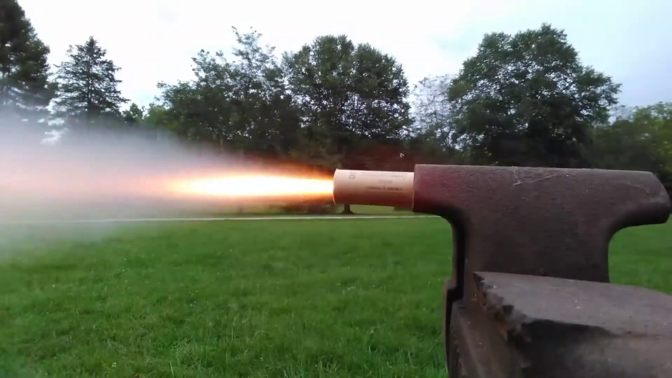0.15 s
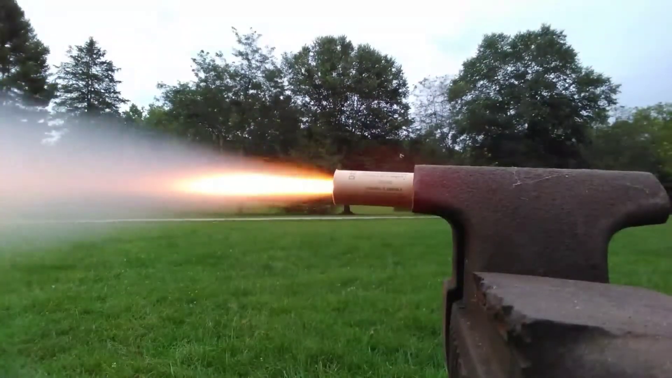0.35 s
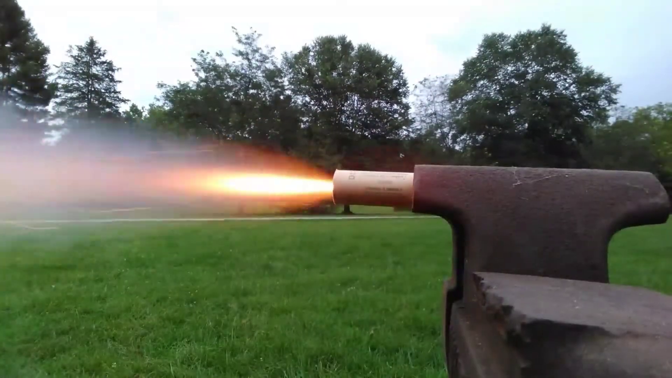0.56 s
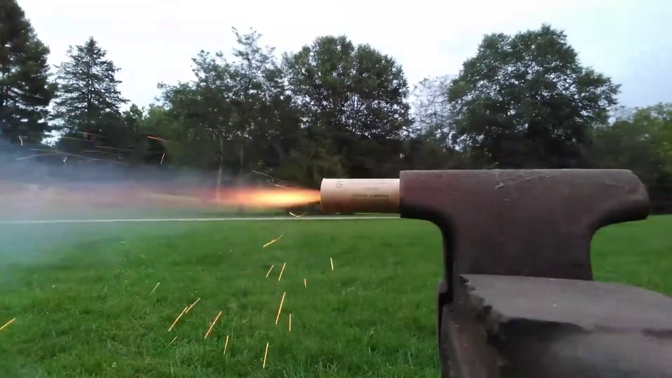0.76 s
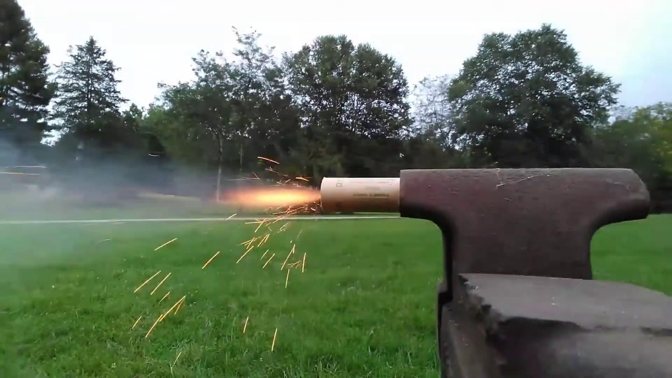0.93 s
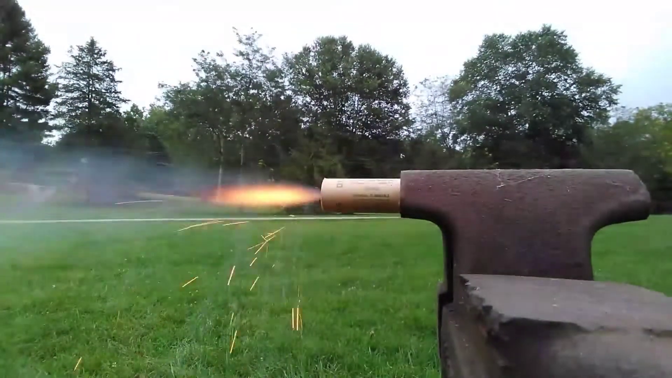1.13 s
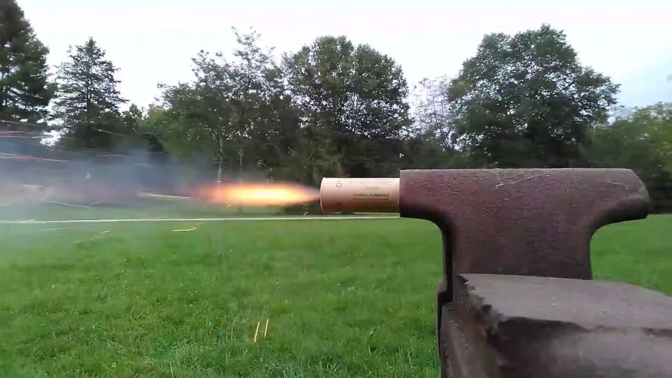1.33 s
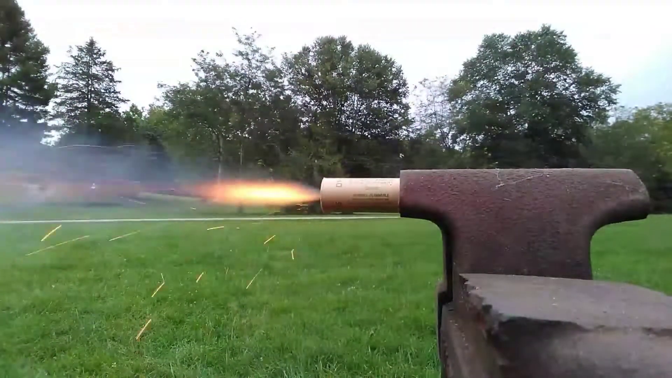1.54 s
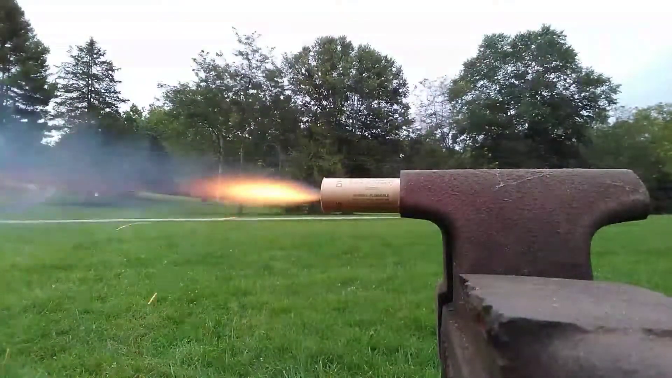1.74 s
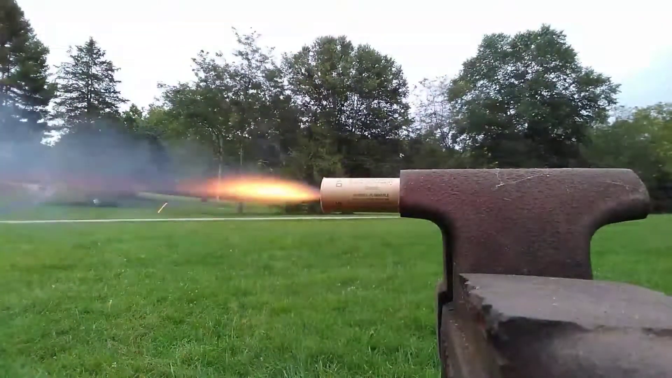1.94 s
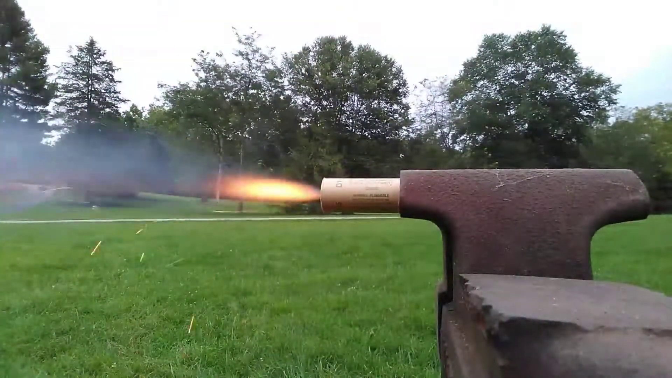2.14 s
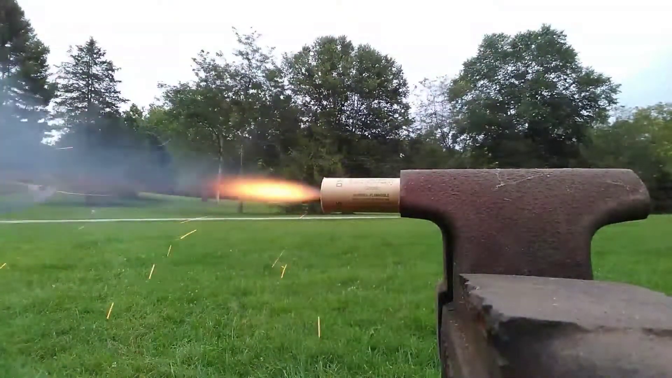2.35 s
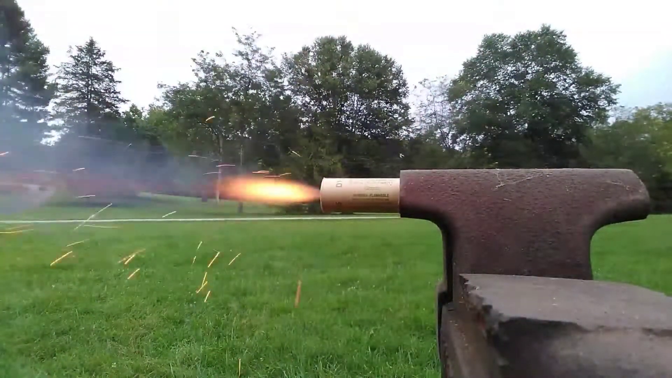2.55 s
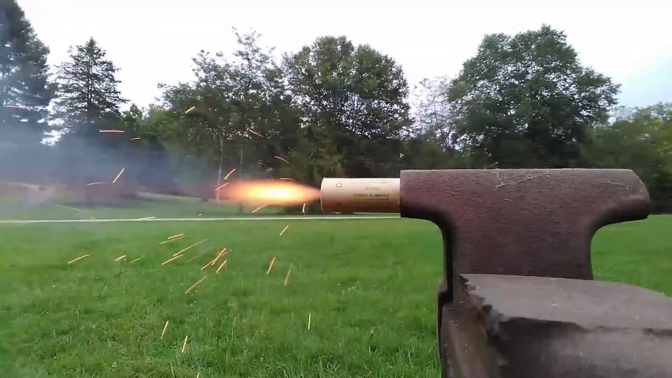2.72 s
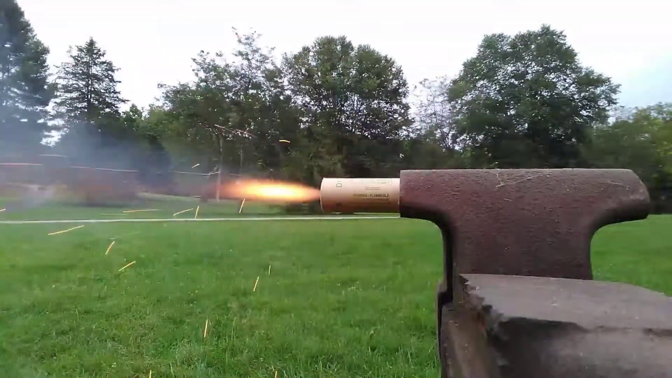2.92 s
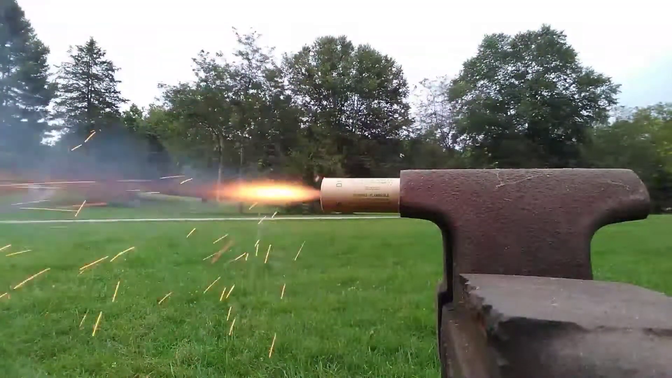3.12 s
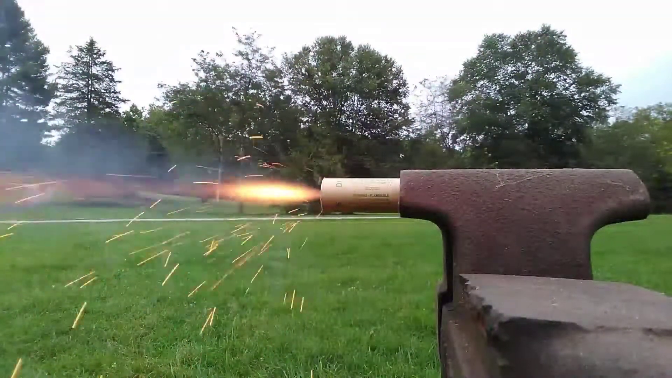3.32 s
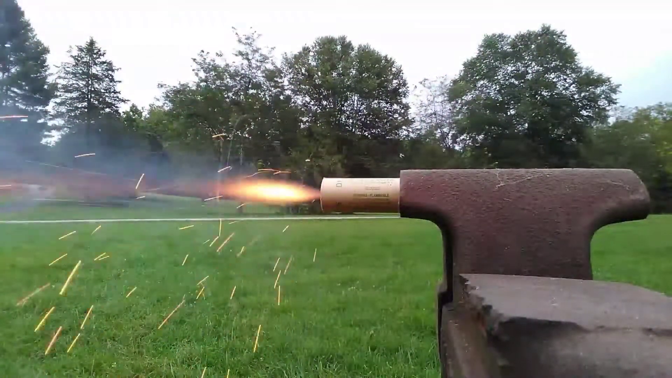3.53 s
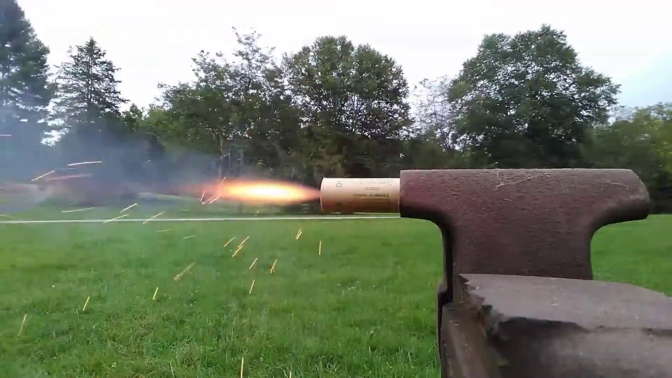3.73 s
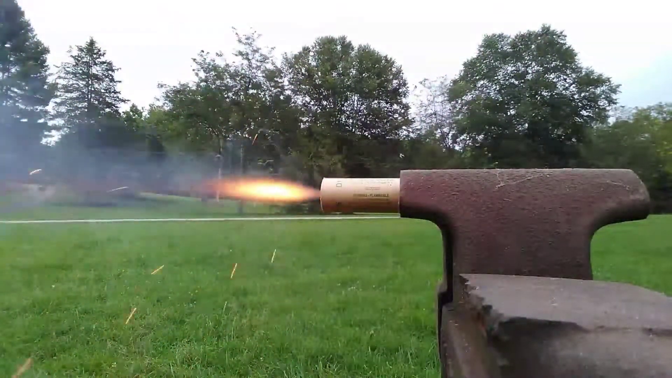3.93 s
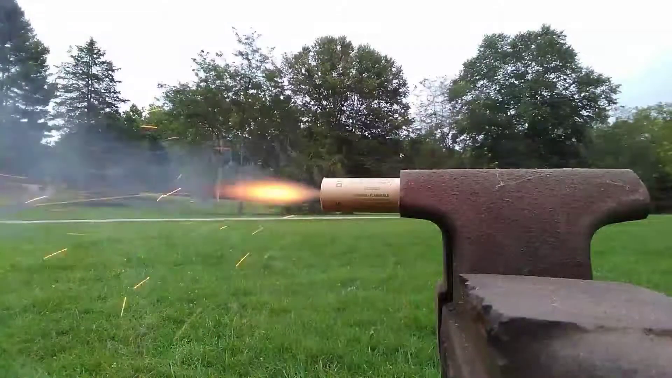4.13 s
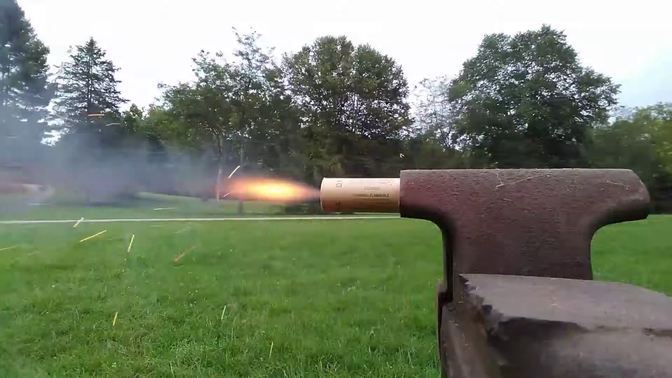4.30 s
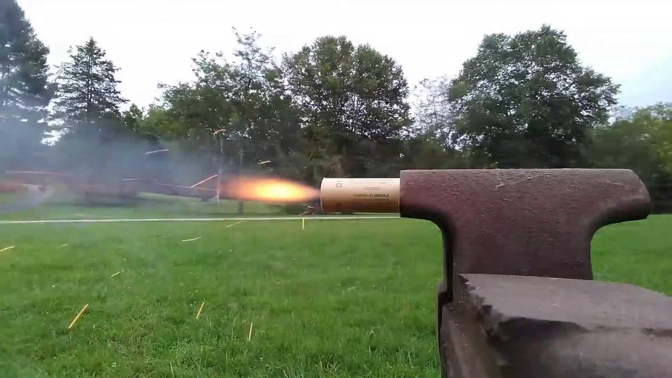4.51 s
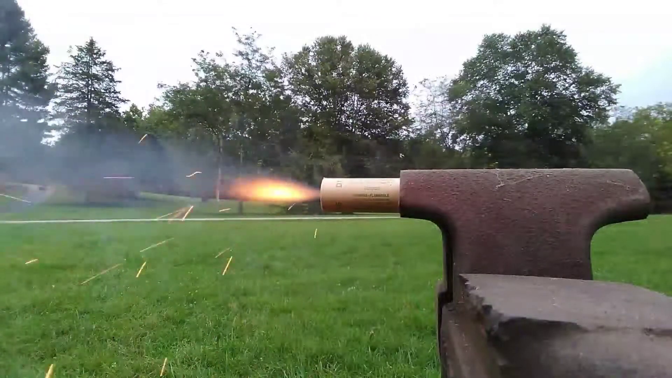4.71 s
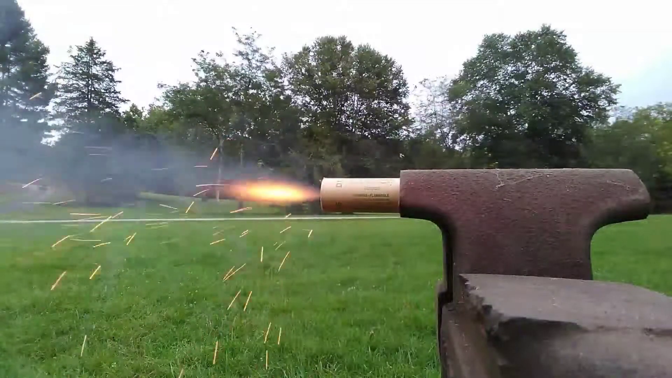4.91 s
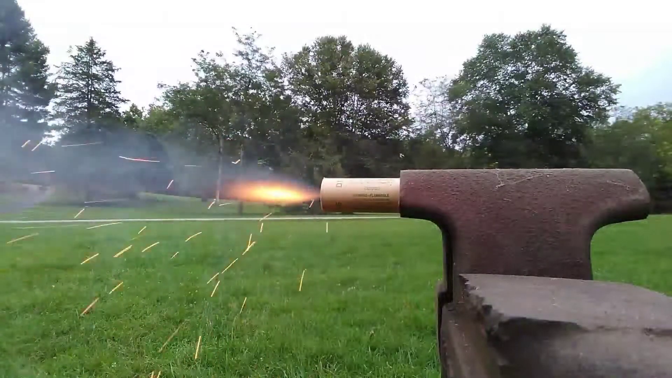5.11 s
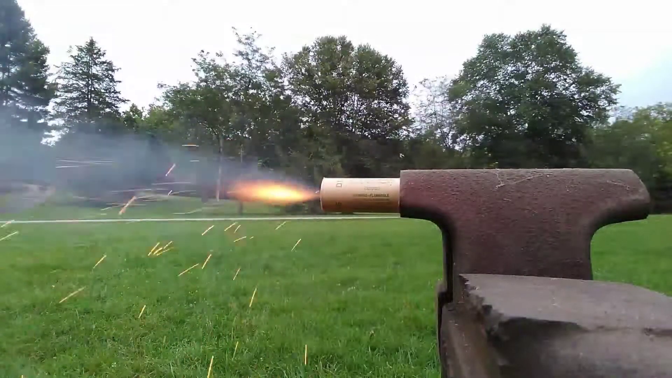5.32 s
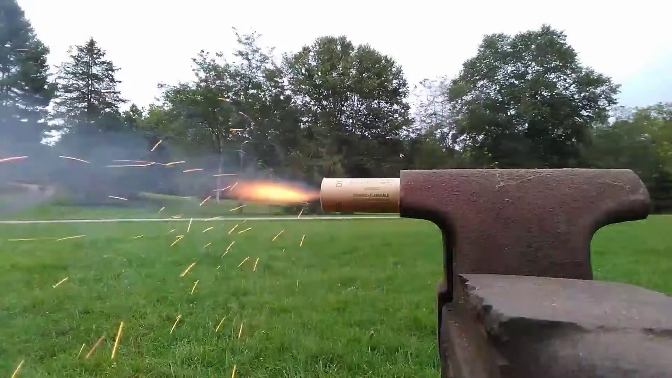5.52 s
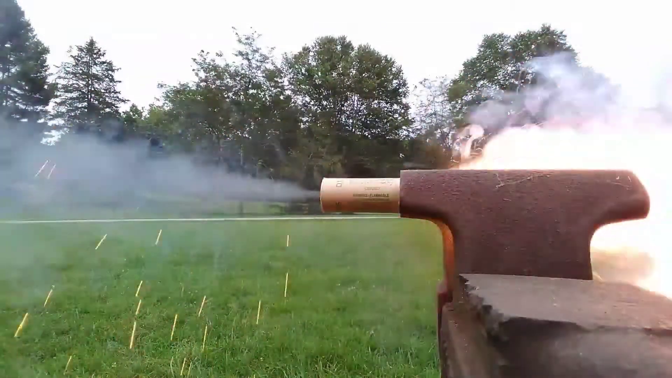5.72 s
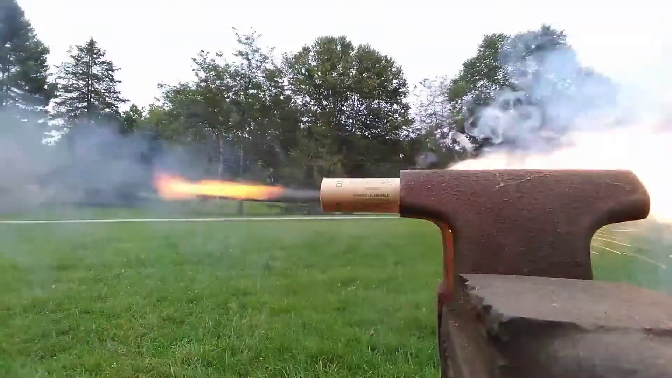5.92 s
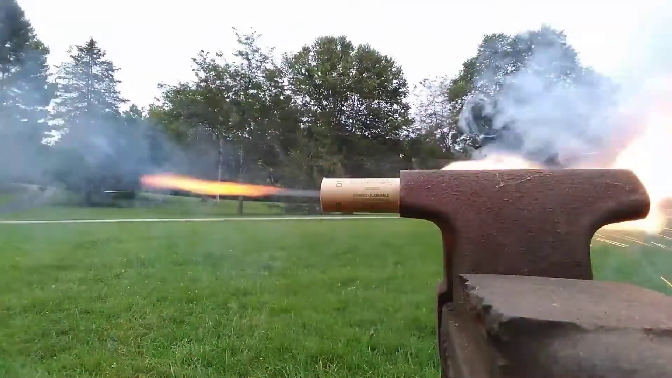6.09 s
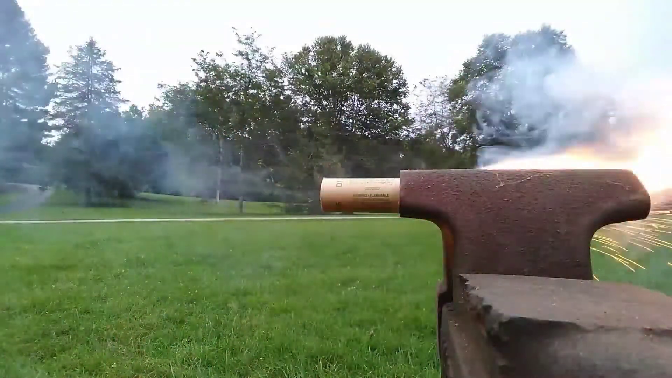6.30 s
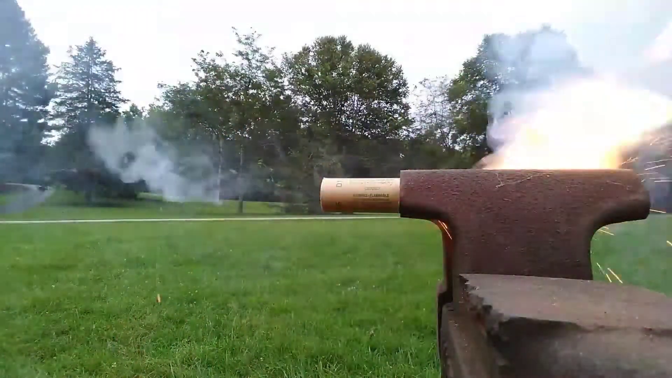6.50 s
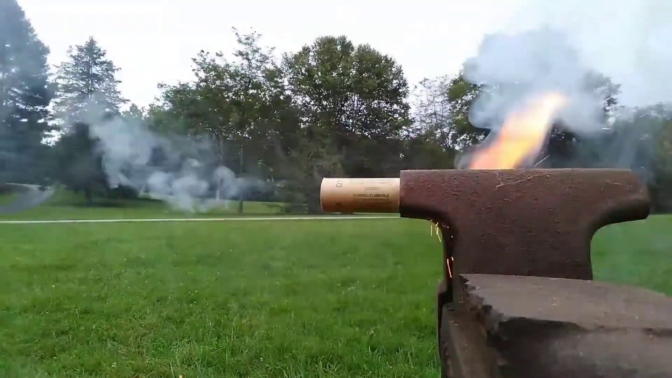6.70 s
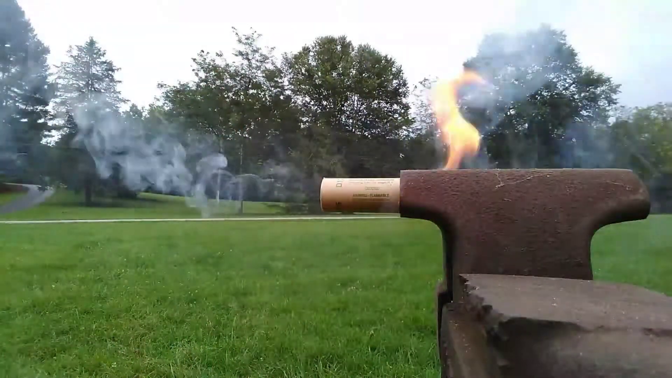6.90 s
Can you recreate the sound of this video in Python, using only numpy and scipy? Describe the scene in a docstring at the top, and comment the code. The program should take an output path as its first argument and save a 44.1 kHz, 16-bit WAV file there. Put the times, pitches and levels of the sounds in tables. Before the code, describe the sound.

A broad, loud rush of burning gas collapses abruptly into a thin, slightly hollow hiss with small flickers and surges. It grows for over a second and holds, slowly sinking, until a snappy double crack and pop cut it off. A short low whoosh vents and dies, a dull echo fades from the trees, and a very faint smoulder and distant insect are left. Close, wide stereo phone pickup in open air.

```python
"""Small rocket motor in a vise

A small black-powder rocket motor burns in a steel vise on a lawn, close to a phone held sideways.
Plume, flame and vented gas are turbulent noise shaped in colour and level; puffs are damped, sagging tones.
The plume roars, shrinks to a hiss at the nozzle, then the ejection charge blows out of the far end.
Trees return a scattered echo, the casing smoulders over still air and a far insect joins in.
The phone widens its two ports by subtracting each from the other."""
import sys
import numpy as np
from scipy import signal
from scipy.fft import rfft, irfft, next_fast_len
from scipy.io import wavfile
from scipy.ndimage import uniform_filter1d, map_coordinates

SR = 44100
rng = np.random.default_rng(int(sys.argv[2]) if len(sys.argv) > 2 else 0)


def decibels_to_gain(level_db):
    """Convert a level in decibels to a linear amplitude gain (20 dB per decade)."""
    exponent = np.asarray(level_db, float) / 20
    return 10 ** exponent


def dump(signal):
    """Clip the signal to [-1, 1] and save it as 16-bit WAV at the path in sys.argv[1]."""
    limited = np.clip(np.atleast_2d(signal).T, -1, 1)
    pcm = np.round(limited * 32767).astype(np.int16)
    wavfile.write(sys.argv[1], SR, pcm)


N = 306495  # samples
SIZE = next_fast_len(N + 8192)  # transform length with room for filter tails
HZ = np.fft.rfftfreq(SIZE, 1 / SR)
T = np.arange(N) / SR


def curve(rows, column=1):
    """Linear interpolation: a table column over time, held at its ends."""
    return np.interp(T, [r[0] for r in rows], [r[column] for r in rows])


def across(rows, column=1):
    """Interpolation on a logarithmic frequency axis: a table column over frequency."""
    return np.interp(np.log(HZ + 1), np.log([r[0] for r in rows]), [r[column] for r in rows])


def sound(spectrum):
    """Inverse Fourier transform: back from frequencies to samples."""
    return irfft(spectrum, SIZE)[..., :N]


def filtered(x, gain):
    """Linear filtering: multiplies the spectrum by a gain for each frequency."""
    return sound(rfft(x, SIZE) * gain)


def delay(ms):
    """A pure lag is a phase that falls linearly with frequency."""
    return np.exp(-2j * np.pi * HZ * ms / 1000)


def resonance(hz, width_hz, db):
    """A resonance is a bell-shaped lift about its centre frequency."""
    return 1 + (decibels_to_gain(db) - 1) / (1 + (2 * (HZ - hz) / width_hz) ** 2)


def unit(x):
    """Normalisation to an rms of 1 over all samples and ports."""
    return x / np.sqrt(np.mean(x ** 2))


def ramp(start, length):
    """Linear onset: climbs from 0 to 1 over length s."""
    return np.clip((T - start) / length, 0, 1)


def since(start):
    """Elapsed time: seconds after start, 0 before."""
    return np.maximum(T - start, 0)


def bumps(rows):
    """Gaussian swells and dips in dB; each length is the full width at 1/e."""
    return sum(db * np.exp(-(2 * (T - s) / length) ** 2) for s, db, length in rows)


def walk(rate):
    """Slow random modulation: levels held 1 / rate s, then smoothed twice, with an rms of 1."""
    k = int(SR / rate)
    held = np.repeat(rng.standard_normal(N // k + 1), k)
    slewed = uniform_filter1d(uniform_filter1d(held, k), k)
    return unit(slewed[:N])


def turbulence(gust_db, flicker_db, rate):
    """Turbulent noise: incoherent at two ports, its octaves sharing gusts but flickering each alone."""
    out, gust = 0, gust_db * walk(rate)
    for low in 20 * 2. ** np.arange(10):
        band = filtered(rng.standard_normal((2, N)), (HZ >= low) & (HZ < 2 * low))
        out = out + band * decibels_to_gain(gust + flicker_db * walk(2.5 * rate))
    return out


def puff(s, first_hz, t60, left, right, sag):
    """Damped oscillation: a puff of pressure swings ever more slowly as the gas cloud grows."""
    t, sag_time_s = since(s), .009
    hz = first_hz * (sag + (1 - sag) * np.exp(-t / sag_time_s))
    swing = np.sin(2 * np.pi * np.cumsum(hz * (t > 0)) / SR)
    return np.outer([left, right], swing * np.exp(-np.log(1000) * t / t60))


def cricket():
    """Amplitude modulation: a far insect is narrow-band noise cut into even pulses."""
    hz, width_hz, pulses_per_s, start_s, level_db = 7400, 200, 24.3, 6.384, -77
    song = unit(filtered(rng.standard_normal(N), np.exp(-((HZ - hz) / width_hz) ** 2)))
    pulses = np.maximum(np.sin(2 * np.pi * pulses_per_s * (T - start_s)), 0) ** 2
    return song * pulses * ramp(start_s, 0.16) * decibels_to_gain(level_db)


def smoulder():
    """Partial coherence: faint fizz over still air, alike at the two ports mainly in the bass."""
    # colour of the air: (frequency [Hz], left relative level [dB], right relative level [dB])
    air_colour = [(40, -15.5, -10), (70, -2, 1.5), (150, 0.9, 3.5), (500, -8, -8), (890, -14.5, -16.5),
                  (1680, -2, -14), (2320, -18, -19.5), (4200, -16.5, -13.5), (6300, -12.5, -15.5),
                  (9000, -19, -22.5), (12000, -21, -27), (14500, -26, -28)]
    # one last flare: (time [s], change [dB], length [s])
    flare = [(6.83, 4, 0.097)]
    fizz_db, still_air_db = -65.5, -69
    wane_s, waning_s, wane_db = 6.62, 0.087, 5.5

    left, other = turbulence(gust_db=.3, flicker_db=.7, rate=10)
    like = 0.76 / (1 + (HZ / 2500) ** 2)
    right = filtered(left, like) + filtered(other, np.sqrt(np.clip(1 - like ** 2, 0, 1)))
    colour = decibels_to_gain(np.array([across(air_colour, column=1), across(air_colour, column=2)]))
    air = unit(filtered(np.array([left, right]), colour))
    fizz = filtered(air, 1 / (1 + (HZ / 4500) ** 4))
    airy_top = air - fizz  # held free of the waning and the flare
    fizz_level = decibels_to_gain(fizz_db - wane_db * ramp(wane_s, waning_s) + bumps(flare))
    return fizz * fizz_level + airy_top * decibels_to_gain(still_air_db)


def trees(x):
    """Diffuse scattering: convolution with decaying noise gives the tree line's dull returns."""
    level_db, t60_s, dull_hz = -54, 1.4, 400
    shared, own = rng.standard_normal(N), rng.standard_normal((2, N))
    first_return = T > .03
    scatter = (shared + 0.3 * own) * decibels_to_gain(level_db - 60 * T / t60_s) * first_return
    size = next_fast_len(2 * N)
    echo = irfft(rfft(scatter, size) * rfft(x.mean(axis=0), size), size)[:, :N]
    return filtered(echo, 1 / (1 + (HZ / dull_hz) ** 2))


def vent():
    """Jet noise: burning gas pours from the opened end, on the right port's side, and loses its top first."""
    # colour of the venting gas: (frequency [Hz], relative level [dB])
    vent_colour = [(40, -15), (200, 8.5), (700, -7), (1000, -7), (1700, -5), (2500, -15.5), (3800, -19),
                   (5500, -34.5), (9000, -34.5), (12000, -34.5), (14500, -32.5)]
    start_s, rise_s = 5.58, .022
    start_db, ease_db_per_s = -42, 25
    shut_s, shut_db, shutting_s = 5.76, 16.5, .065
    top_db, dulls_db_per_s = 4.0, 60

    shared, own = turbulence(gust_db=1.7, flicker_db=0.5, rate=36)
    own = filtered(own, 1 / np.sqrt(1 + (450 / (HZ + 1)) ** 2))
    left = filtered(shared, delay(0.22)) + .8 * own  # reaches the left port later
    gas = unit(filtered(np.array([left, shared]), decibels_to_gain(across(vent_colour))))
    top = filtered(gas, 1 / (1 + (4200 / (HZ + 1)) ** 4))
    gas = gas + top * (decibels_to_gain(top_db - dulls_db_per_s * since(start_s)) - 1)
    # swells, eases, shuts off, trickles away
    db = start_db - ease_db_per_s * since(start_s + rise_s) - shut_db * ramp(shut_s, shutting_s)
    return gas * decibels_to_gain(db) * ramp(start_s, rise_s) ** 2


def blows():
    """Impulsive gas release: chuffs at burnout, then cracks and a deep boom of the charge."""
    # pressure puffs: (time [s], first pitch [Hz], t60 [s], left amplitude, right amplitude)
    puffs = [(.618, 154, 0.028, .02, 0.18), (0.635, 186, 0.019, .02, 0.4),
             (5.5633, 760, 0.0046, 0.43, 0.37), (5.5792, 607, .012, .1, 0.25),
             (5.5804, 450, 0.013, 0.45, 0.42), (5.589, 602, 0.014, .12, .08)]
    chuffs_and_cracks = sum(puff(*row, sag=.85) for row in puffs)  # sag: share of the first pitch left at the end
    boom = puff(5.5797, first_hz=224, t60=0.059, left=0.51, right=0.055, sag=.2)
    return chuffs_and_cracks + boom


def flame():
    """Comb filtering: a compact hiss at the nozzle interferes with its reflection off the vise jaw."""
    # flame swelling until about 2 s, then slowly sinking: (time [s], level [dB])
    flame_level = [(0.72, -36.5), (0.94, -33), (1.3, -32.5), (1.65, -27.5), (2.05, -24.5), (2.6, -26),
                   (3.1, -27), (3.67, -28.5), (4.2, -28.5), (4.6, -29), (5.1, -29.5), (5.55, -30)]
    # colour of the hiss: (frequency [Hz], relative level [dB])
    nozzle_colour = [(40, -33.5), (120, -11), (300, -6.5), (750, -3), (1080, -7), (1600, -0.76), (2200, -4),
                     (3300, -5), (5500, -10.5), (7300, -11), (9500, -13.5), (12400, -15.5), (13500, -18.5),
                     (14300, -16.5)]
    # reflection at the left, then right port: (extra path [ms], share [ratio])
    jaw = [(.558, 0.64), (0.569, 0.51)]
    # how the right port differs from the left: (frequency [Hz], level against left [dB], likeness [0-1])
    port_difference = [(100, 0.4, 0.98), (700, -0.16, .97), (1100, 0.7, 0.5), (1490, 0, 1),
                       (2100, -0.5, 0.95), (2600, 0.5, 1), (3600, -1, 1), (4280, -5.5, 0.8),
                       (4630, -1.5, 1), (5000, -4.5, 0.98), (6500, 0, 0.78), (7400, -3, 0.3),
                       (8820, -2.5, 0.02), (14500, -10, 0.5)]
    # the flame chokes or spits: (time [s], change [dB], length [s])
    surges = [(2.38, -3, 0.13), (2.48, 2.5, 0.08), (3.97, 2.5, 0.52), (4.12, -0.5, 0.2), (4.2, 4.5, 0.012),
              (4.35, 3.5, 0.17), (5.47, 2, 0.1)]
    surge_treble_share = 0.17
    # treble against body: an early afterglow, then brightening ever more slowly
    afterglow_db, afterglow_s, treble_start_db, brighten_db, brighten_power = 21, 0.27, -10, 4.5, 0.57
    # bass against body: comes in late; a stronger flame has less of this lift
    bass_settled_db, bass_start_db, bass_settling_s = 2.5, -6.5, 0.49
    bass_db_per_db, usual_flame_db = -0.14, -25
    end_s, ending_s = 5.575, 0.0017

    near, other = turbulence(gust_db=0.9, flicker_db=0.96, rate=14)
    like = np.clip(across(port_difference, column=2), 0, 1)
    far = filtered(near, like * delay(0.018)) + filtered(other, np.sqrt(1 - like ** 2))
    paper_tube_ring = resonance(hz=2230, width_hz=83, db=4.3)
    colour = decibels_to_gain(across(nozzle_colour)) * paper_tube_ring
    right_colour = colour * decibels_to_gain(across(port_difference))
    direct = filtered(np.array([near, far]), np.array([colour, right_colour]))

    # the jaw is too small for long waves, too rough for short ones
    turned = filtered(direct, 1 / (1 + (1200 / (HZ + 1)) ** 2) / np.sqrt(1 + (HZ / 9000) ** 4))
    sway = 1 + .006 * walk(6)  # the licking flame changes the path a little
    late = []
    for x, (ms, share) in zip(turned, jaw):
        arrival = (T - ms / 1000 * sway) * SR
        late.append(share * map_coordinates(x, [arrival], order=3))
    hiss = unit(direct + late)

    treble = filtered(hiss, 1 / (1 + (4500 / (HZ + 1)) ** 2))
    bass = filtered(hiss, 1 / (1 + (HZ / 500) ** 2))
    level_db, surge = curve(flame_level), bumps(surges)
    t = since(flame_level[0][0])
    treble_db = treble_start_db + brighten_db * t ** brighten_power
    treble_db = treble_db + afterglow_db * np.exp(-t / afterglow_s)
    treble_db = treble_db - (1 - surge_treble_share) * surge
    bass_db = bass_settled_db + bass_start_db * np.exp(-t / bass_settling_s)
    bass_db = bass_db + bass_db_per_db * (level_db - usual_flame_db)
    hiss = hiss + treble * (decibels_to_gain(treble_db) - 1) + bass * (decibels_to_gain(bass_db) - 1)
    burning = np.clip((end_s - T) / ending_s, 0, 1)  # dies as the charge opens the far end
    return hiss * decibels_to_gain(level_db + surge) * burning


def plume():
    """Distributed jet noise: eddies along the plume reach the ports unalike; the charge rushes so, duller."""
    # colour of the roar: (frequency [Hz], left relative level [dB], right relative level [dB])
    plume_colour = [(30, -21.5, -24.5), (70, -7.5, 2.5), (198, -3.5, 2.5), (500, -5.5, -3), (1500, -12, -3),
                    (3000, -13, -5.5), (5140, -17, -9.5), (8700, -13, -11), (14300, -22.5, -19)]
    # brief lulls in the thrust: (time [s], change [dB], length [s])
    lulls = [(.14, -1.5, 0.13), (.31, -1.4, .06)]
    thrust_db, treble_db = -18, -1.5
    # sags as the grain runs out, then collapses and lingers
    sag_s, sag_db_per_s = 0.51, 28.5
    burnout_s, collapse_db, collapse_s, linger_db_per_s = 0.633, 11.5, 0.032, 148
    # gas rush of the ejection: swells to its peak and dies
    rush_s, rush_db, rush_rise_s, rush_db_per_s = 5.576, -16, .0045, 1300

    colour = decibels_to_gain(np.array([across(plume_colour, column=1), across(plume_colour, column=2)]))
    roar = unit(filtered(turbulence(gust_db=.4, flicker_db=.6, rate=14), colour))
    treble = filtered(roar, 1 / (1 + (2500 / (HZ + 1)) ** 2))
    dying = collapse_db * ramp(burnout_s, collapse_s) + linger_db_per_s * since(burnout_s + collapse_s)
    thrust = decibels_to_gain(thrust_db + bumps(lulls) - sag_db_per_s * since(sag_s) - dying)
    swell = np.exp(-(np.minimum(T - rush_s, 0) / rush_rise_s) ** 2)
    rush = decibels_to_gain(rush_db - rush_db_per_s * since(rush_s)) * swell
    dull = filtered(roar, 1 / (1 + 1j * HZ / 6000))
    return (roar + treble * (decibels_to_gain(treble_db) - 1)) * thrust + dull * rush


def scene():
    """Superposition: motor, its echo, the quiet air and the insect add up at the two ports."""
    motor = plume() + flame() + blows() + vent()
    return motor + trees(motor) + smoulder() + cricket()


def roll_off(x):
    """The treble ends steeply here."""
    return signal.sosfilt(signal.butter(12, 14340, fs=SR, output="sos"), x)


def record(dry):
    """Cavity resonance at the left port, then crosswise subtraction of late, filtered copies widens the pair."""
    # widening: (frequency [Hz], share of the other port taken off [0-1])
    cross = [(60, 0.67), (500, 1), (1050, .9), (2100, 0.75), (4200, 0.92), (6300, 0.76), (8400, 0.18),
             (11000, 0.058), (14500, 0.063)]
    left, right = rfft(dry, SIZE)
    left = left * resonance(hz=12250, width_hz=2020, db=11.45)
    share = np.clip(across(cross), 0, 1)
    wide_left = left - share * delay(ms=0.4865) * right
    wide_right = right - share * delay(ms=0.4653) * left
    return roll_off(sound(np.array([wide_left, wide_right])))


dry = scene()
out = record(dry)
dump(out)
```